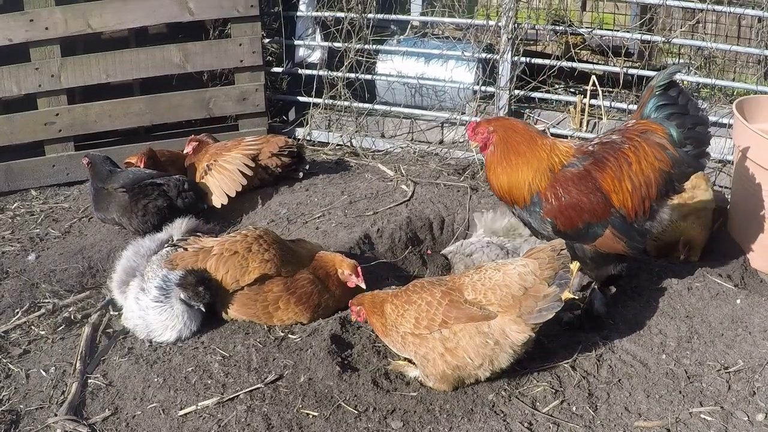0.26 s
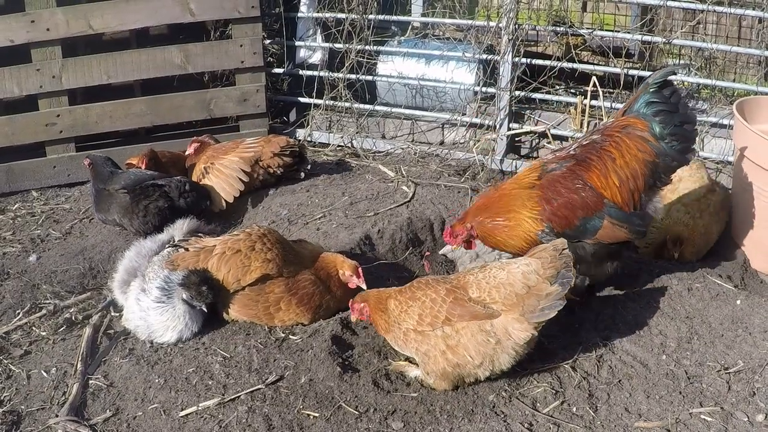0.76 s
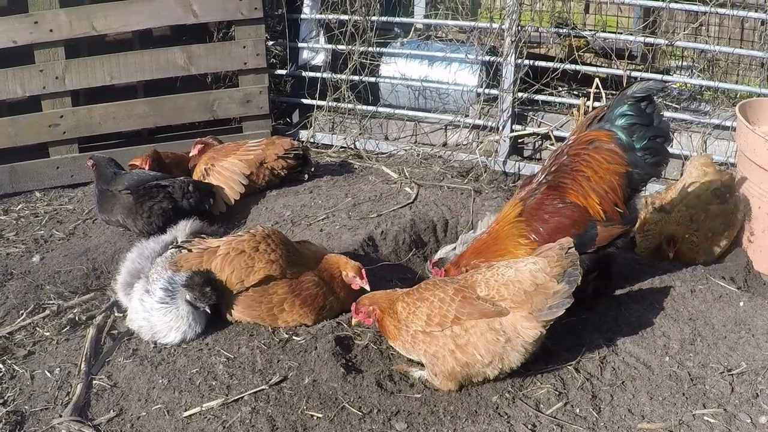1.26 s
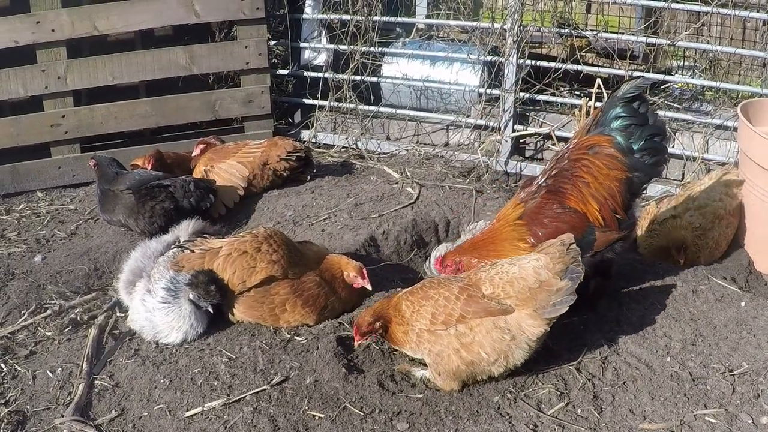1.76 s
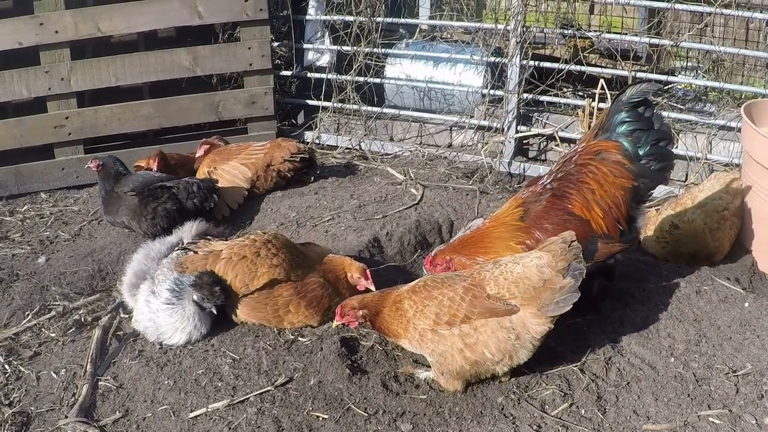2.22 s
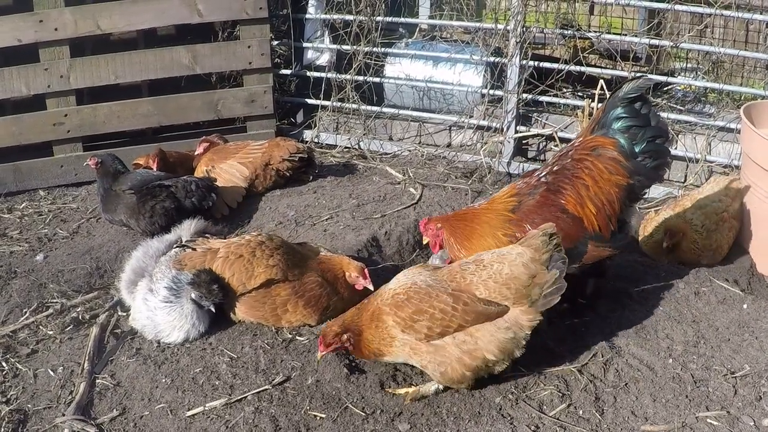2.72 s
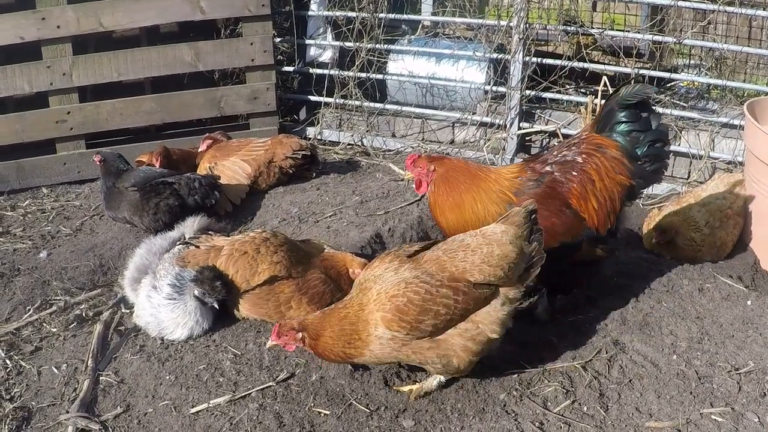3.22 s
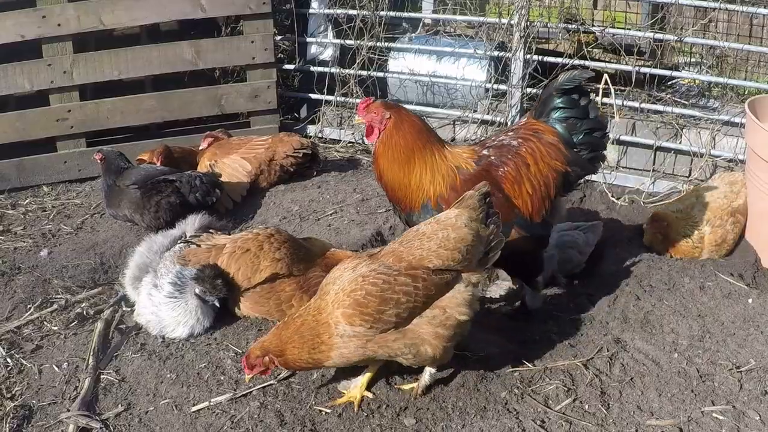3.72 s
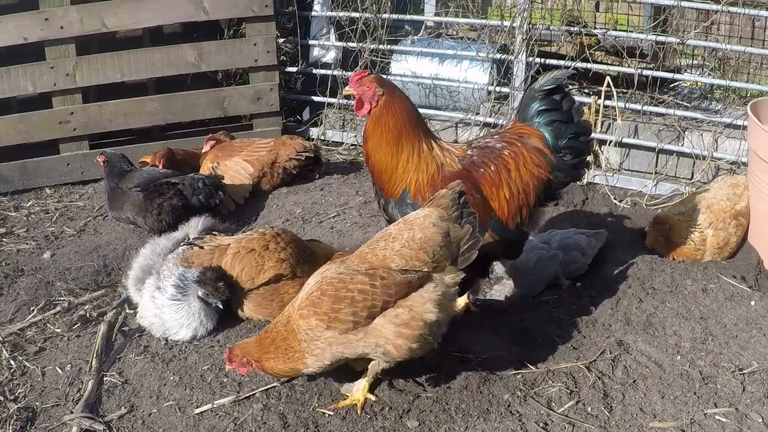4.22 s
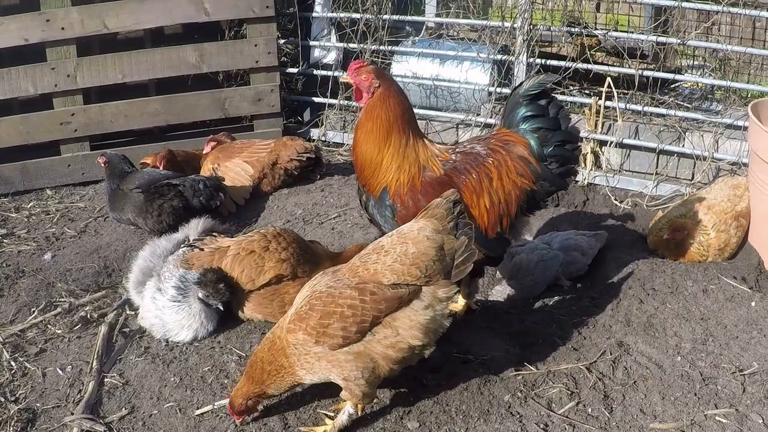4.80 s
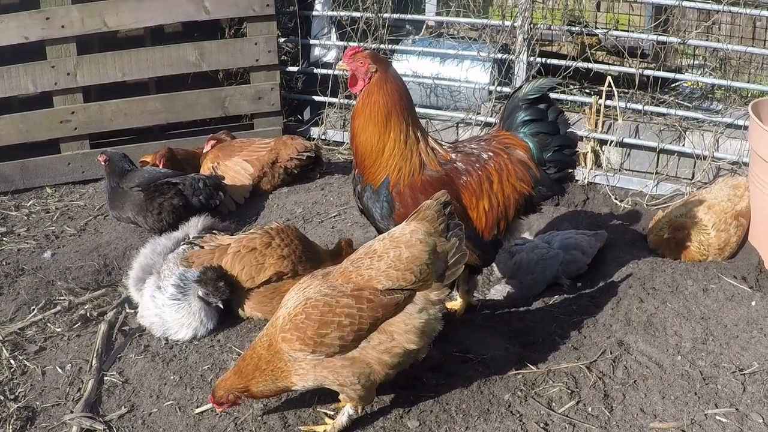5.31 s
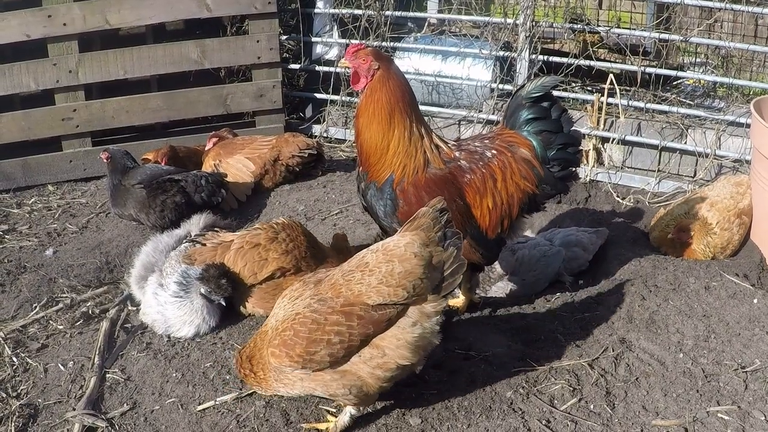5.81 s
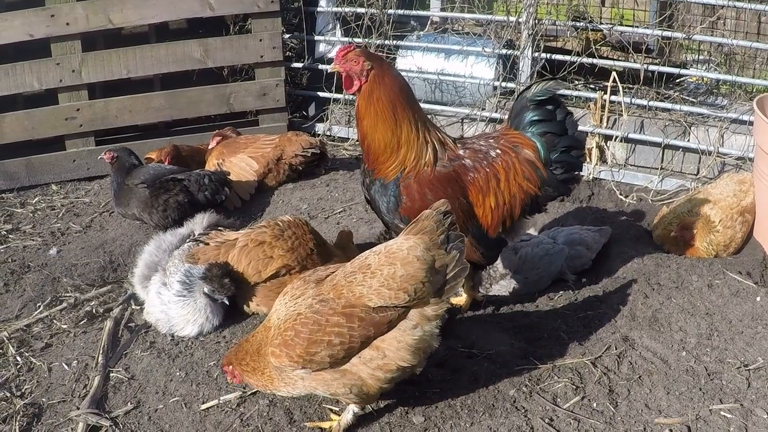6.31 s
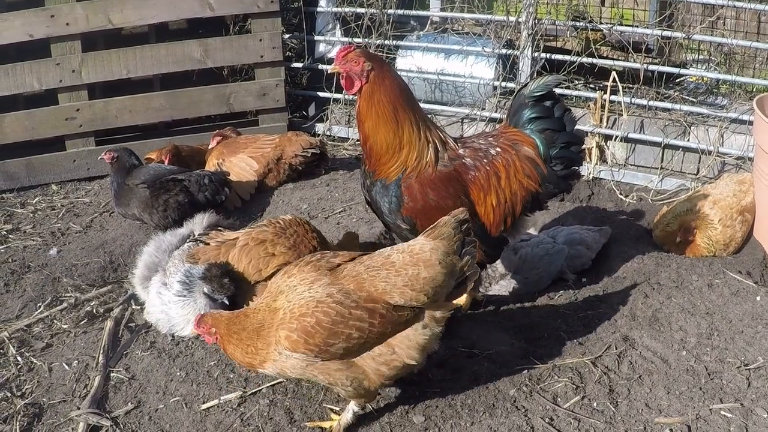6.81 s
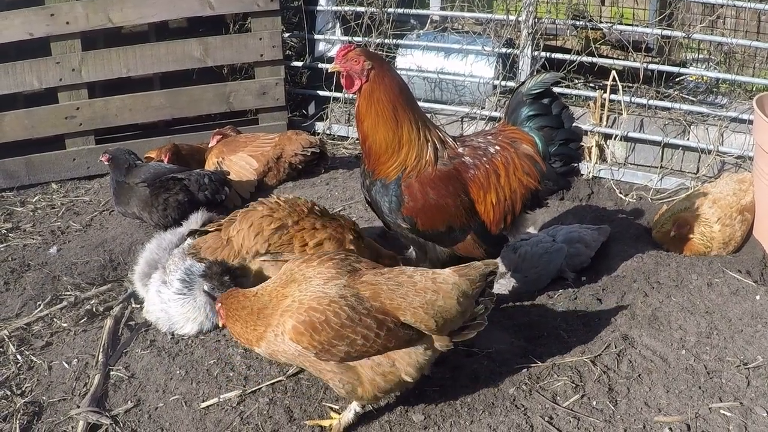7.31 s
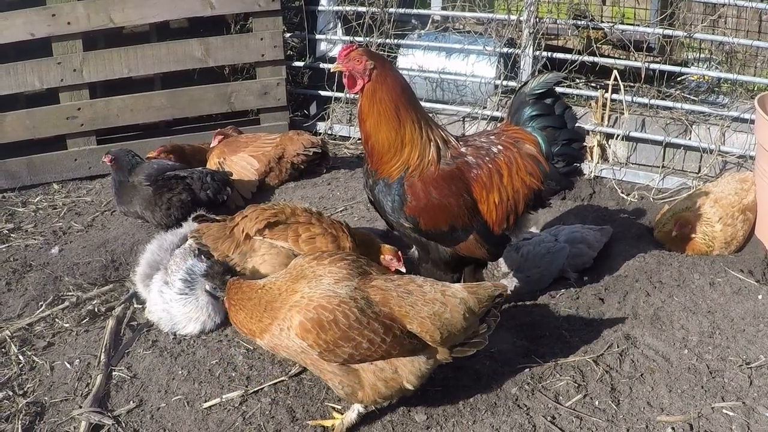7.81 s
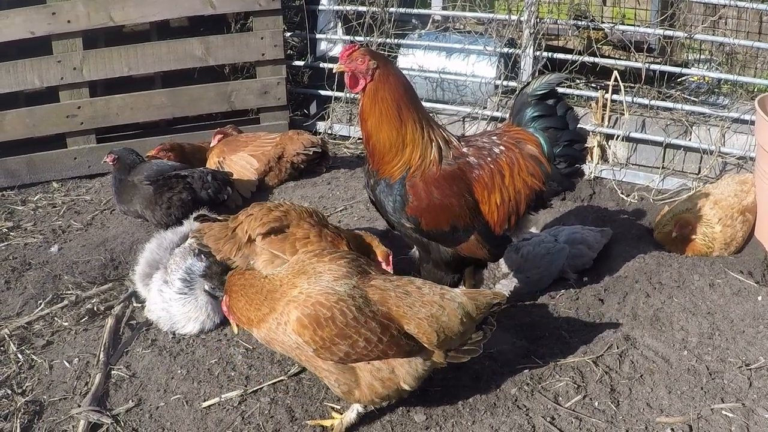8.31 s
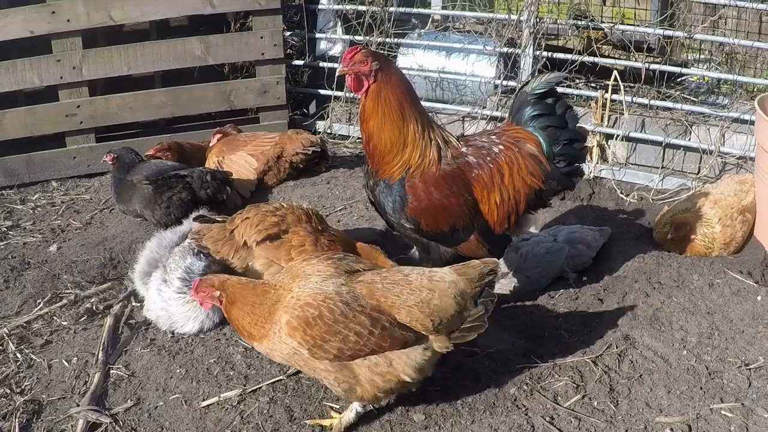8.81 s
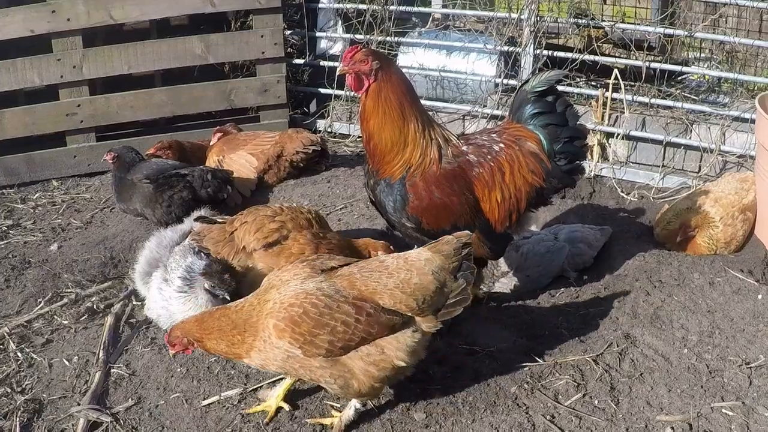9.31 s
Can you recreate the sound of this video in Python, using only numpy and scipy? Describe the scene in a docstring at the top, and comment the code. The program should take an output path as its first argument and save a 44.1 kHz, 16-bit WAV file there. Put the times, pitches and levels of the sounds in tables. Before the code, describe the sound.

Hens cluck and squawk in an outdoor run, with hoarse rasping calls, a brief scratch of dry soil and faint small-bird whistles.

```python
"""A near hen's clucks come first, in loose runs, some leading into rising squawks, in an outdoor chicken run.
A farther hen answers, another bird rasps, feet scratch dust, small birds whistle and dull knocks sound close by.
Voices are overtones and breath shaped by a throat; dust and air are shaped noise; whistles and knocks are sines.
Fences give a short echo; the two microphone ports hear the birds a fraction of a millisecond apart."""
import sys
import numpy as np
from scipy import signal
from scipy.fft import rfft, irfft, next_fast_len
from scipy.io import wavfile
from scipy.ndimage import uniform_filter1d, map_coordinates

SR = 44100
rng = np.random.default_rng(int(sys.argv[2]) if len(sys.argv) > 2 else 0)


def pcm_store(signal):
    """Save signal as 16-bit PCM."""
    levels = np.round(np.clip(np.atleast_2d(signal), -1, 1) * 32767)
    wavfile.write(sys.argv[1], SR, levels.astype(np.int16).T)


N = 421155

# near hen's squawks: start_s, length_s, first_pitch_hz, dwell_s, glide_s, held_pitch_hz, throat_tightens_at_s, level_db
NEAR_SQUAWKS = [(1.27, 0.5, 542.9, 0.086, 0.087, 623.5, 1.585, -21.5),
                (3.811, 0.4764, 518, 0.072, 0.059, 619.8, 3.95, -21),
                (6.596, 0.4916, 506.3, 0.018, .13, 625, 6.87, -21.5)]
# far hen's squawks, same columns
FAR_SQUAWKS = [(1.095, .675, 507, 0.016, 0.053, 661.3, 1.56, -35),
               (4.0, 0.781, 596.7, 0.01485, 0.09, 678, 4.57, -35.5)]
# near clucks: time_s, level_db, top_pitch_hz, brightness_db_per_octave, fundamental_over_overtones_db
NEAR_CLUCKS = [(0.086, -30, 443, -1, -11), (0.313, -29.5, 484.6, 3.5, -6.5), (0.544, -27, 512, 0, -8.5),
               (0.774, -26, 498, 4.5, -11.5), (1.018, -25.5, 544, 5, -7.5), (1.975, -29.5, 492, -2, -14),
               (5.431, -26.5, 445, -2, -18.5), (5.641, -27.5, 467.3, -2, -19.5),
               (5.871, -26, 478.2, -0.5, -19), (6.111, -24.5, 504, -0.5, -18), (6.36, -28, 491, 0, -14.5),
               (7.271, -27, 494, -2, -14), (8.247, -27.5, 445, 2.5, -10), (8.461, -23, 519, -0.5, -11),
               (8.685, -23.5, 521, -0.5, -10), (8.917, -26.5, 475, 0.5, -11.5),
               (9.156, -25, 484.4, -0.5, -15.5), (9.387, -25, 471.6, 0.5, -12.5)]
# short clipped clucks, farther off: time_s, level_db, top_pitch_hz
CLIPPED_CLUCKS = [(1.914, -35, 494), (2.83, -33, 477)]
# duller clucks from farther off: time_s, level_db, top_pitch_hz
DULL_CLUCKS = [(.232, -36, 488), (0.466, -34.5, 457), (.71, -36, 434), (4.481, -31.5, 445),
               (4.9, -41.5, 446)]
# where the near voice cracks: time_s, half_width_s, roughness (0-1)
NEAR_CRACKS = [(1.538, 0.005, 0.24), (3.925, 0.018, 0.66), (4.096, 0.017, 0.39), (6.878, 0.011, 0.82)]
# where the far voice cracks, same columns
DISTANT_CRACKS = [(4.35, 0.064, 0.64), (4.49, 0.019, .5)]
# windpipe resonance: pitch_over_held_pitch (ratio), fundamental_boost_db
WINDPIPE_BOOST = [(.75, -31), (.87, -9.5), (.92, -12), (.97, -6), (1.03, 3.5)]
# near throat with the beak wide: frequency_hz, level_db
WIDE_THROAT = [(900, -6.5), (1270, 3), (1520, -8.5), (1820, 12), (2100, 9), (2700, -12), (3200, -9.5),
               (3560, -2.5), (3900, -21.5), (4460, -18.5), (9000, -29), (13000, -65)]
# near throat late in a squawk: frequency_hz, level_db
STRAINED_THROAT = [(900, -20), (1270, 1.5), (1900, -5), (2540, -11.5), (3190, -5), (3820, -27.5),
                   (4460, -23.5), (6400, -26.5), (13000, -54.5)]
# throat with the beak nearly shut: frequency_hz, level_db
SHUT_THROAT = [(300, -6.5), (950, 5), (1450, -5), (2050, 5), (2400, -3), (2800, -11), (3300, -8.5),
               (4300, -30.5), (6000, -16.5), (11000, -60)]
# far hen's throat: frequency_hz, level_db
FAR_THROAT = [(900, -7), (1330, 0), (2000, 1.5), (2660, -5.5), (3320, -11), (4000, -26), (5400, -16.5),
              (13000, -53)]
# far hen's throat late in a squawk: frequency_hz, level_db
FAR_STRAINED_THROAT = [(1330, -5.5), (2000, 6.5), (2660, -18), (3320, -18), (4000, -64), (13000, -99)]
# hoarse calls: start_s, swell_s, fade_s, peak_db, first_roughness (0-1)
HOARSE_CALLS = [(.8, 0.32, 0.021, -32, 0.35), (3.09, .02, .04, -51, .6), (3.455, 0.18, 0.11, -29, .7),
                (6.29, 0.069, 0.22, -28, 0.6), (8.064, .2, 0.05, -29, 0.42)]
# resonances of the hoarse throat: frequency_hz, width_hz, level_db
HOARSE_RESONANCES = [(713, 160, -3), (1174, 105, 8.5), (1434, 19.3, 13), (1722, 230, -2), (2450, 380, -4),
                     (3650, 430, -12.5), (4360, 170, -11.5), (5840, 220, -3.5), (7330, 1960, -19.5)]
# scratching feet: peak_s, rise_s, fall_s, peak_db
FOOT_SCRATCHES = [(5.403, 0.47, 0.43, -39), (5.814, 0.32, 0.15, -44.5), (6.095, 0.28, 0.36, -32),
                  (6.29, 0.09, 1, -38)]
# colour of the thrown dust: frequency_hz, relative_level_db_per_hz
DUST_COLOUR = [(3000, -0.5), (4490, -6.5), (6150, 15.5), (8100, 5.5), (14900, -24)]
# arched whistles: start_s, length_s, foot_hz, top_hz, level_db
ARCHED_WHISTLES = [(1.159, 0.05, 4290, 5865, -31), (6.412, 0.036, 5150, 5690, -35.5)]
# one falling whistle: time_s, pitch_hz, level_db
FALLING_WHISTLE = [(1.9, 5830, -38.5), (1.93, 5390, -46), (1.97, 5300, -43), (2.0, 4980, -56),
                   (2.075, 4520, -58)]
# plain notes and chips: start_s, length_s, first_hz, last_hz, level_db (before trembling)
BIRD_NOTES = [(0.685, 0.12, 5190, 5600, -57), (1.448, 0.017, 5950, 5400, -45.5),
              (2.132, 0.019, 2560, 3150, -57), (2.184, 0.024, 2620, 3300, -56.5),
              (2.259, 0.018, 4770, 4320, -55.5), (2.295, 0.016, 4750, 4200, -58),
              (2.505, 0.02, 4080, 4970, -58.5), (2.327, 0.015, 5030, 4200, -55.5),
              (2.396, 0.011, 5850, 5610, -43), (5.004, 0.063, 4440, 4440, -63.5),
              (5.478, 0.1, 4530, 4390, -61), (5.89, 0.17, 5350, 5600, -64),
              (6.202, 0.046, 4160, 4260, -57.5), (7.553, 0.073, 3600, 3240, -56.5),
              (7.725, 0.061, 3060, 2800, -57), (7.87, 0.15, 3160, 2850, -60), (8.77, 0.05, 4580, 4500, -66),
              (9.25, 0.094, 4530, 4440, -62)]
# trill syllables: start_s, level_db (before trembling)
TRILL_SYLLABLES = [(2.53, -52), (2.562, -47), (2.599, -46), (2.635, -50)]
# dull knocks: start_s, first_level_db (before the low cut), ring_hz, t60_s
DULL_KNOCKS = [(1.749, -1, 237, 0.0058), (2.359, -24, 181, 0.094), (3.62, -5.5, 231, 0.0056),
               (4.969, -30, 200, 0.016)]
# how fast the fence echo dies: frequency_hz, t60_s
FENCE_DECAY = [(1000, 0.23), (8000, 0.048)]
# colour of the background air: frequency_hz, relative_level_db_per_hz
AIR_COLOUR = [(22, -16), (118, -30.5), (140, 0.5), (241, -3), (862, -9), (1420, -14), (3170, -23.5),
              (6000, -23.5), (10700, -27), (14900, -46.5)]
# left-right likeness of the air: frequency_hz, correlation (-1 to 1)
AIR_LIKENESS = [(40, 0.92), (130, 0.13), (600, -0.8), (3000, 0.033)]
# shading between the ports, scaled for each source: frequency_hz, left_minus_right_db
PORT_LEAN = [(690, .4), (1260, 4.5), (2300, -1.2), (8000, -4)]

AIR_DB = -48
TOP_HZ = 15060  # upper band limit
# squawks
SCOOP, SCOOP_S, GLIDE_BEND = 0.09, 0.01155, 1.4  # the first instant is this share flat; shape of the climb
RELEASE_S, RELEASE_DB, BURST_DB = 0.03, 44, 3  # the call breaks off with a push of air
CLEAR, ROUGH_IN_S, CRACK_DB = 0.13, 0.03, 5  # held roughness, time to clear, level lost in a full crack
ONSET_DB, SWELL_S = 33.5, 0.026  # overtones start this far down and swell
WAVER_DB = 1.1  # the held call is never quite steady
TURN_S = .025  # time the throat takes to tighten
OPENING_S, OPENING_PITCH, OPENING_DB = .04, .85, -3.5  # the beak is still shut as a squawk begins
# air left in the throat as a squawk stops; its pitch starts a share higher and slides down
GASP_HZ, GASP_WIDTH_HZ, GASP_DB, GASP_T60_S = 1350, 300, 3, 0.08
GASP_DROP, GASP_DROP_S = 0.322, 0.0112
# treble tilt per octave: behind the other birds, or through a shut beak
HIDDEN_TILT_DB, OPENING_TILT_DB = -5.5, -1
HIDDEN_LOW_DB, CLIPPED_LOW_DB = -24.5, -6  # fundamental of dull and opening clucks, and of clipped ones
# rasps: levels against the peak, after a faint false start
RASP_START_DB, RASP_END_DB, RASP_TAIL_S, RASP_TAIL_DB = -5.5, -7, 0.055, -28
LEAD_S, LEAD_DB, LEAD_DIP_DB = .09, -12.5, -28.5
RASP_HZ, VOICED_S = 420.4, .075  # a rasp begins to break after this time
CATCH_HZ, CATCH_DB, CATCH_T60_S = 3100, -9, 0.23  # a bright catch in the throat as a rasp starts
SCRATCH_DROP_DB = 55.5
# small birds
FOOT_DB = -27  # ends of an arched whistle, against its top
ARCH_UP, ARCH_DOWN = .25, .63  # shares of the length where the top begins and ends
TICK_S, TICK_HZ, TICK_END_HZ = 0.0061, 6160, 5340  # each syllable of the trill is a tick,
SLUR_AFTER_S, SLUR_S, SLUR_HZ, SLUR_END_HZ, SLUR_DB = 0.0073, 0.016, 6670, 5960, -1  # then a higher slur


def squawks(calls, throat, later, cracks, creep_hz, low_db, overtone_rise_db):
    """Pitch climbs to a held note as the windpipe lifts the fundamental; creep and overtone rise are per second."""
    out = np.zeros(N)
    for s, length, first_hz, dwell, glide, held_hz, turn, db in calls:
        t = np.arange(round(length * SR)) / SR
        climb = 1 - np.exp(-(np.maximum(t - dwell, 0) / glide) ** GLIDE_BEND)
        hz = first_hz + (held_hz - first_hz) * climb + creep_hz * t
        hz = hz * (1 - SCOOP * np.exp(-t / SCOOP_S))

        end = (t - length) / RELEASE_S + 1  # runs from 0 to 1 during the release
        push = np.exp(-(2 * end) ** 2)
        fall_db = RELEASE_DB * np.maximum(end, 0)
        crack = sum(depth * np.exp(-((s + t - at) / width) ** 2) for at, width, depth in cracks)
        rough = CLEAR + 0.33 * np.exp(-t / ROUGH_IN_S) + crack + np.clip(end, 0, 1)
        turned = (1 + np.tanh((s + t - turn) / TURN_S)) / 2
        low, high = voice(hz, rough, throat, later, turned, smear=.055)

        windpipe_db = np.interp(hz / held_hz, *np.transpose(WINDPIPE_BOOST))
        low_part = amp(low_db - CRACK_DB * crack + windpipe_db) * low
        high_db = BURST_DB * push - ONSET_DB * np.exp(-t / SWELL_S) + overtone_rise_db * t
        high_db = high_db - CRACK_DB * crack + WAVER_DB * wobble(7.1, count=len(t))
        add(out, round(s * SR), amp(db - fall_db) * (low_part + amp(high_db) * high))
    return out


def gasps(calls):
    """The breath left when the voice stops rushes through the closing throat."""
    out, t = np.zeros(N), np.arange(SR // 4) / SR
    for s, length, *_, db in calls:
        noise = rng.standard_normal(len(t))
        rush = filtered(noise, lambda f: resonance(f, GASP_HZ, GASP_WIDTH_HZ) ** 2)
        # reading the noise faster at first makes its pitch slide down
        position = np.cumsum(1 + GASP_DROP * np.exp(-t / GASP_DROP_S))
        rush = map_coordinates(rush, [position], mode="mirror")
        level = amp(db + GASP_DB - 60 * t / GASP_T60_S) * (1 - np.exp(-t / 0.00047))
        add(out, round((s + length - RELEASE_S) * SR), level * unit(rush))
    return out


def clucks(calls, length_s):
    """Each puff arches in pitch and level with scratchy ends; the neck is never held quite alike."""
    out, u = np.zeros(N), np.linspace(0, 1, round(length_s * SR))
    edge = np.abs((u - .5) * 2) ** 1.3
    puff = np.sin(np.pi * u ** .85) ** 1.5
    rough = .16 + .75 * edge
    for s, db, hz, tilt_db, low_db in calls:
        throat = [(f * rng.normal(1, .03), level + tilt_db * np.log2(f / 1000)) for f, level in SHUT_THROAT]
        pitch = hz * (1 - 0.39 * edge ** 1.7)
        low, call = voice(pitch, rough, throat, throat, turned=0, smear=.08)
        mellow = filtered(call, lambda f: 1 / (1 + (f / 1600) ** 4))
        # the treble opens only with full effort
        high = mellow + puff ** 0.18 * (call - mellow)
        add(out, round((s - .09 * length_s) * SR), amp(db) * puff * (amp(low_db) * puff * low + high))
    return out


def voice(hz, rough, throat, later, turned, smear):
    """A syrinx, the bird's voice organ: its fundamental, and overtones with pulsed breath, each near rms 1."""
    n, rough = len(hz), np.clip(rough, 0, 1)
    phase = 2 * np.pi * np.cumsum(hz * (1 + .035 * rough * wobble(250, count=n))) / SR
    k = np.arange(2, 24)[:, None]  # overtone numbers
    # each overtone wavers on its own; the higher it is, the more its line smears
    flutter = np.array([wobble(30, count=n) for _ in k])
    blur = (.001 + smear * rough) * k ** 2 * np.array([wobble(120, count=n) for _ in k])
    # the throat turns from its first shape into the later one
    colour_db = (1 - turned) * along(throat, k * hz) + turned * along(later, k * hz)
    tones = amp(colour_db + (6 * rough + .3 * k) * flutter) * np.cos(k * (phase - .6) + blur)
    # a rough voice varies in size from cycle to cycle
    tones = tones * amp(5 * rough * wobble(180, count=n))
    # a strained voice at times alternates strong and weak cycles
    alternation = .3 * turned * np.clip(wobble(8, count=n), 0, 1)
    tones = tones * (1 + alternation * np.cos(phase / 2))
    # breath noise comes through once per cycle
    gated = rng.standard_normal(n) * (1 + np.cos(phase))
    early_breath, late_breath = [unit(filtered(gated, lambda f: amp(along(shape, f)) * (f > 350)))
                                 for shape in (throat, later)]
    breath = (1 - turned) * early_breath + turned * late_breath
    fundamental = np.sqrt(2) * np.cos(phase - .6)
    return fundamental, np.sqrt(1 - rough ** 2) * unit(tones.sum(0)) + rough * breath


def hoarse_throat(f):
    """Throat resonances of the hoarse bird, added with alternating signs."""
    return sum((-1) ** k * amp(db) * resonance(f, hz, width)
               for k, (hz, width, db) in enumerate(HOARSE_RESONANCES))


def rasps():
    """Slack membranes beat more steadily at first, then break into sputtering air in the same throat."""
    out = np.zeros(N)
    for s, swell, fade, peak_db, first in HOARSE_CALLS:
        fade_end = s + swell + fade
        start, (db,) = span([(s - LEAD_S, peak_db + LEAD_DB), (s - .004, peak_db + LEAD_DIP_DB),
                             (s + 0.0065, peak_db + RASP_START_DB), (s + swell, peak_db),
                             (fade_end, peak_db + RASP_END_DB),
                             (fade_end + RASP_TAIL_S, peak_db + RASP_TAIL_DB)])
        n = len(db)
        t = (start + np.arange(n)) / SR - s
        rough = np.interp(t, [VOICED_S, VOICED_S + .04], [np.clip(first, 0, 1), .72])
        # the false start is lower in pitch
        hz = RASP_HZ * np.where(t < 0, .83, 1) * (1 + .12 * rough ** 2 * wobble(150, count=n))
        cycles = np.cumsum(hz) / SR
        pulses = np.diff(np.floor(cycles), prepend=0) * amp(5 * rough * wobble(200, count=n))
        beats = filtered(pulses, lambda f: hoarse_throat(f) / (1 + (f / 3200) ** 4))
        sputter = filtered(rng.standard_normal(n) * amp(3.5 * wobble(130, count=n)), hoarse_throat)
        call = np.sqrt(1 - rough ** 2) * unit(beats) + rough * unit(sputter)
        # the neck stretches, so the resonances wander
        glide = np.cumsum(1 + .025 * wobble(14, count=n))
        call = map_coordinates(call, [glide], mode="mirror")
        catch = unit(filtered(rng.standard_normal(n), lambda f: resonance(f, CATCH_HZ, 390) ** 2))
        catch = catch * (t > 0) * amp(CATCH_DB - 60 * abs(t) / CATCH_T60_S)
        add(out, start, amp(db) * (call + catch))
    return out


def scratches():
    """Dry soil thrown aside: dense grit, a hiss with fast lumps."""
    out = np.zeros(N)
    grit = rng.standard_normal(N) * amp(2.2 * wobble(430, count=N))
    grit = unit(filtered(grit, lambda f: amp(along(DUST_COLOUR, f)) * (f > 300)))
    for s, rise, fall, peak_db in FOOT_SCRATCHES:
        quiet_db = peak_db - SCRATCH_DROP_DB
        start, (db,) = span([(s - rise, quiet_db), (s, peak_db), (s + fall, quiet_db)])
        add(out, start, amp(db) * grit[start:start + len(db)])
    return out


def songbirds():
    """Small birds: pure gliding whistles, and quick chips that tremble in level."""
    out = np.zeros(N)
    arches = [[(s, foot, db + FOOT_DB), (s + ARCH_UP * length, top, db),
               (s + ARCH_DOWN * length, top, db + 0.5), (s + length, foot, db + FOOT_DB)]
              for s, length, foot, top, db in ARCHED_WHISTLES]
    for rows in arches + [FALLING_WHISTLE]:
        start, (hz, db) = span(rows)
        add(out, start, amp(db) * np.sqrt(2) * np.sin(2 * np.pi * np.cumsum(hz) / SR))

    ticks = [(s, TICK_S, TICK_HZ, TICK_END_HZ, db) for s, db in TRILL_SYLLABLES]
    slurs = [(s + SLUR_AFTER_S, SLUR_S, SLUR_HZ, SLUR_END_HZ, db + SLUR_DB) for s, db in TRILL_SYLLABLES]
    for s, length, first_hz, last_hz, db in BIRD_NOTES + ticks + slurs:
        u = np.linspace(0, 1, round(length * SR))
        hz = first_hz + (last_hz - first_hz) * u ** .8
        level = amp(db + 2 + 3.5 * wobble(70, count=len(u)))
        swell = 2 * np.sin(np.pi * u ** 0.55) ** .45
        add(out, round(s * SR), level * swell * np.sin(2 * np.pi * np.cumsum(hz) / SR))
    return out


def knocks():
    """A sharp front drops at once into a fast-dying low ring; the microphone's low cut trims the bass."""
    out, t = np.zeros(N), np.arange(SR // 10) / SR
    for s, db, hz, t60 in DULL_KNOCKS:
        cycles = hz * (t + 0.00067 * (1 - np.exp(-t / 0.00092)))
        out[round(s * SR):][:len(t)] -= amp(db - 60 * t / t60) * np.sin(2 * np.pi * cycles)
    return filtered(out, lambda f: 1 / (1 + (135 / (f + 1)) ** 14))


def fences(x):
    """Echo, each frequency dying at its own speed: a fresh diffuse pattern every quarter second, blended smoothly."""
    out, step = np.zeros((2, N + SR)), SR // 4
    for start in range(0, N, step):
        hz, t, z = signal.stft(rng.standard_normal((2, SR // 3)), SR, nperseg=256)
        decay = amp(-60 * t / along(FENCE_DECAY, hz)[:, None])
        tail = signal.istft(z * decay, SR, nperseg=256)[1]
        piece = x[start:start + 2 * step]
        piece = piece * np.hanning(2 * step)[:len(piece)]  # overlapping pieces blend smoothly
        echo = signal.fftconvolve(piece[None], tail / np.linalg.norm(tail[0]), axes=1)
        out[:, start:start + echo.shape[1]] += echo
    # slats return little bass, 11 ms late
    return filtered(out[:, :N], lambda f: (f / (f + 500)) ** 2 * np.exp(-2j * np.pi * f * .011))


def air():
    """Distant rumble and the recorder's hiss, in faint patches of time and frequency."""
    z = signal.stft(rng.standard_normal((2, N)), nperseg=512)[2]
    patches = uniform_filter1d(rng.standard_normal(z.shape[1:]), size=6, axis=0)
    patches = uniform_filter1d(patches, size=14, axis=1)
    pair = signal.istft(z * amp(1.4 * unit(patches)), nperseg=512)[1][:, :N]

    def spread(hz):
        """Share what both sides have in common and what differs, by the wanted likeness."""
        angle = np.arccos(np.clip(along(AIR_LIKENESS, hz), -1, 1)) / 2
        return amp(along(AIR_COLOUR, hz)) * [np.cos(angle), np.sin(angle)]

    mid, side = filtered(pair, spread)
    return amp(AIR_DB) * unit(np.array([mid + side, mid - side]))


def ports(x, lead_s, lean):
    """The left port hears lead_s earlier; the body between them shades the sides by lean times PORT_LEAN."""
    side = np.array([[1], [-1]])  # left, right

    def response(f):
        """Level and delay at each port."""
        shade = amp(side * lean * along(PORT_LEAN, f) / 2)
        return shade * np.exp(1j * np.pi * f * (side - 1) * lead_s)

    return filtered(x, response)


def amp(db):
    """Decibels to gain."""
    return 10 ** (np.asarray(db) / 20)


def unit(x):
    """Scaled to rms 1."""
    return x / np.sqrt(np.mean(x ** 2) + 1e-20)


def along(points, hz):
    """(Hz, value) points read on a log axis."""
    f, v = np.transpose(points)
    return np.interp(np.log(hz + 1), np.log(f + 1), v)


def wobble(rate, count):
    """A smooth random curve of count samples, rate knots a second."""
    knots = rng.standard_normal(int(count * rate / SR) + 4)
    return map_coordinates(knots, [np.arange(count) * rate / SR])


def resonance(f, hz, width_hz):
    """One causal resonance: it rings only after it is struck."""
    return 1j * f * width_hz / (hz ** 2 - f * f + 1j * f * width_hz)


def filtered(x, response):
    """x passed through a complex response of frequency."""
    m = next_fast_len(x.shape[-1] + 8192)
    return irfft(rfft(x, m) * response(np.fft.rfftfreq(m, 1 / SR)), m)[..., :x.shape[-1]]


def span(rows):
    """First sample of a call and its columns, one value per sample."""
    s, *cols = np.transpose(rows)
    i = np.arange(round(s[0] * SR), round(s[-1] * SR))
    return i[0], [np.interp(i / SR, s, c) for c in cols]


def add(track, start, x):
    """Mix a call into a track with short fades."""
    i = np.arange(len(x))
    fade = np.clip(np.minimum(i, i[::-1]) / (0.00067 * SR), 0, 1)
    track[start:start + len(x)] += (x * fade)[:N - start]


def scene():
    """All birds, dust, knocks, echo and air together, in stereo."""
    openings = clucks([(s + 0.0078, db + OPENING_DB, OPENING_PITCH * hz, OPENING_TILT_DB, HIDDEN_LOW_DB)
                       for s, _, hz, *_, db in NEAR_SQUAWKS], OPENING_S)
    near = squawks(NEAR_SQUAWKS, WIDE_THROAT, STRAINED_THROAT, NEAR_CRACKS,
                   creep_hz=39.6, low_db=-4.5, overtone_rise_db=10.5)
    near = near + openings + gasps(NEAR_SQUAWKS)
    puffs = clucks(NEAR_CLUCKS, .085)

    clipped = clucks([(*row, HIDDEN_TILT_DB, CLIPPED_LOW_DB) for row in CLIPPED_CLUCKS], 0.0319)
    dull = clucks([(*row, HIDDEN_TILT_DB, HIDDEN_LOW_DB) for row in DULL_CLUCKS], 0.052)
    far = squawks(FAR_SQUAWKS, FAR_THROAT, FAR_STRAINED_THROAT, DISTANT_CRACKS,
                  creep_hz=-12.5, low_db=1.5, overtone_rise_db=3.5)
    far = far + gasps(FAR_SQUAWKS) + clipped + dull

    hoarse = rasps()
    small = scratches() + songbirds()
    # near birds are drier than far ones
    echo = fences(amp(-6) * near + amp(-5) * puffs + amp(-4) * far + amp(1.5) * hoarse + amp(-2.5) * small)
    return (ports(near + puffs, .00025, lean=1.4) + ports(far, .00025, lean=-1.1)
            + ports(hoarse, .00025, lean=1.3) + ports(small, 0.0002, lean=1.0)
            + ports(knocks(), 0.000066, lean=0.047) + echo + air())


def record(dry):
    """The recorder keeps nothing above its band limit."""
    return filtered(dry, lambda hz: hz < TOP_HZ)


dry = scene()
out = record(dry)
pcm_store(out)
```